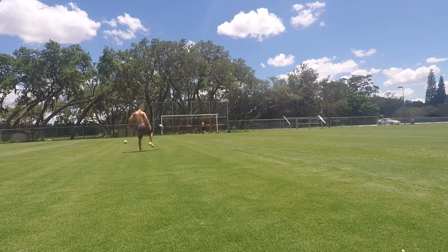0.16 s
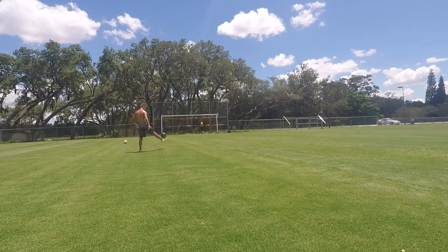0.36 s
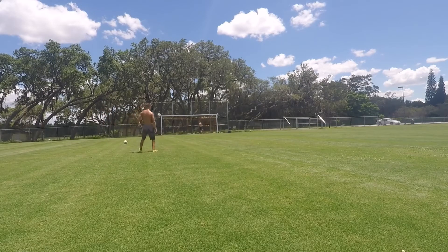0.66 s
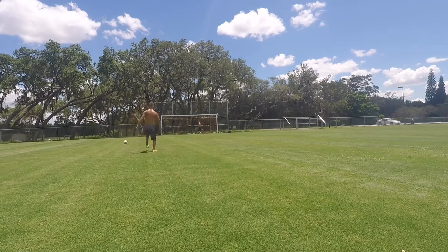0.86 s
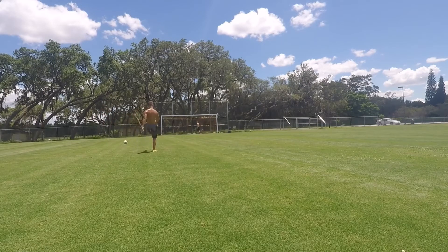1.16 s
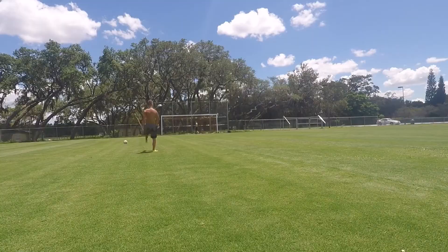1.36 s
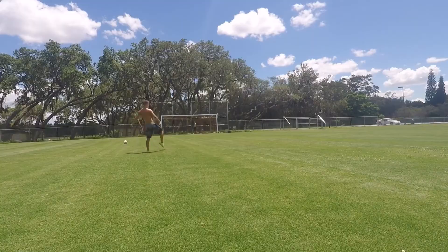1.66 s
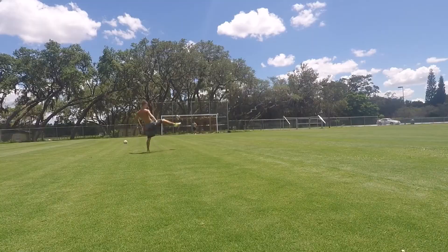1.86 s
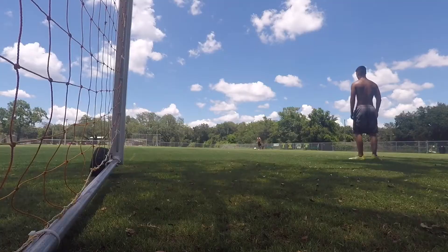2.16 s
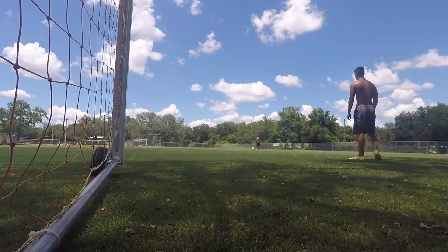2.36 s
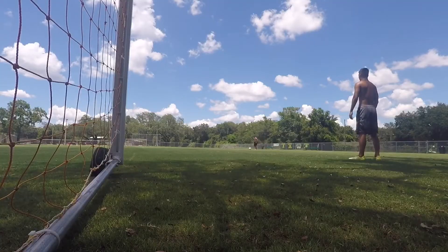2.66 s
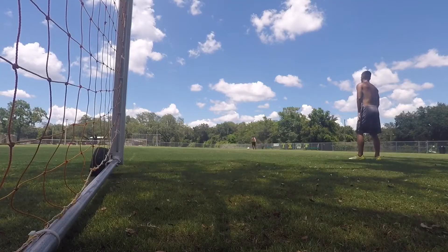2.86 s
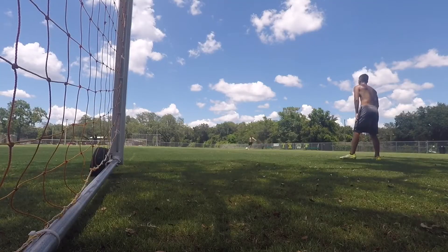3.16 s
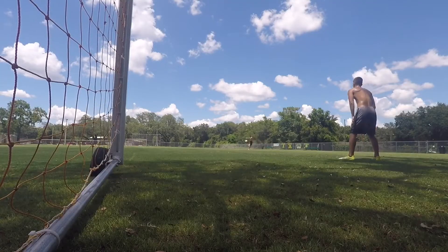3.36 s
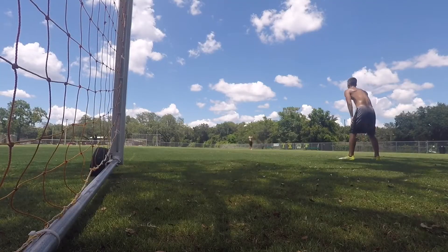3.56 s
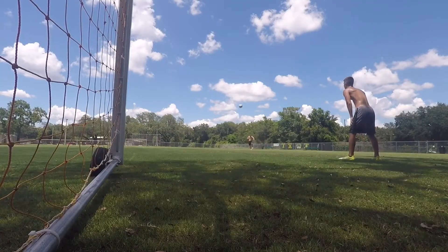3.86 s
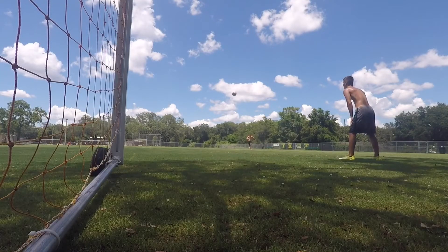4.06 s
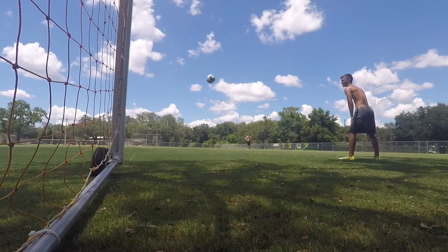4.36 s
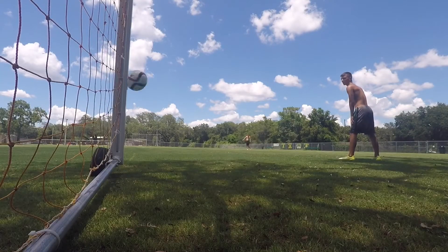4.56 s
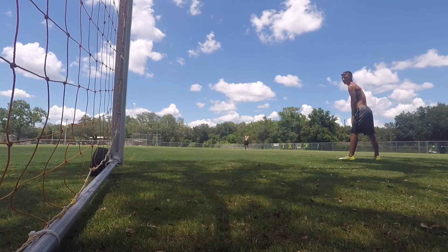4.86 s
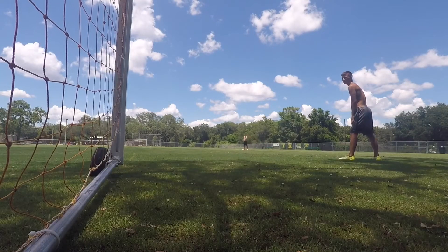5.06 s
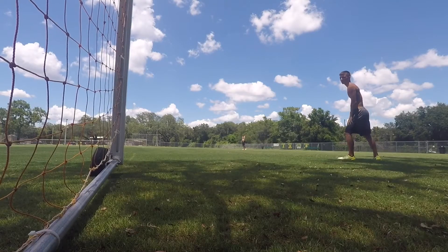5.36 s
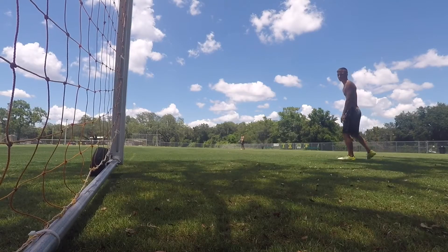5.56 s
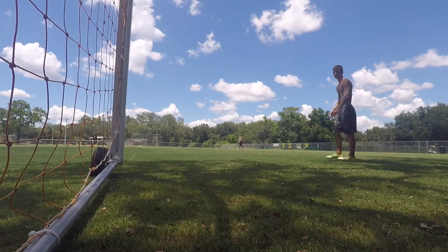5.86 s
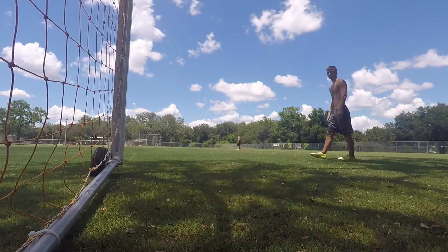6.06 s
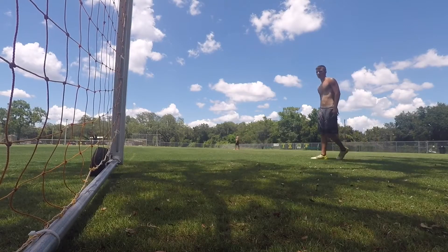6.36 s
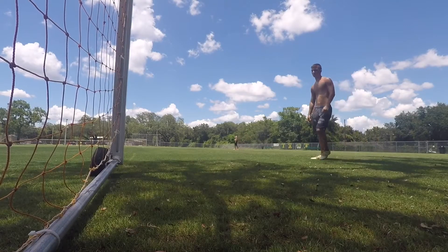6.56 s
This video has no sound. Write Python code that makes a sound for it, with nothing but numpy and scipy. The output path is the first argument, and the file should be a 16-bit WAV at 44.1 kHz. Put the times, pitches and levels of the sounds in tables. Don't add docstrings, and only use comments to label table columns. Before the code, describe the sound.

On an open grass field with light wind buffeting the microphone, a faint cicada and tiny distant birds, a ball is kicked with a slappy thump, touched softly, then kicked again. The background dips and slowly returns beside the goal. A deep far kick thuds, then the ball smashes the hollow metal frame very close and loud, ringing and rattling; it clanks on the ground bar and brushes through the net.

```python
import sys
import numpy as np
from scipy import signal
from scipy.fft import rfft, irfft, next_fast_len
from scipy.io import wavfile
from scipy.ndimage import uniform_filter1d, map_coordinates

SR = 44100
rng = np.random.default_rng(int(sys.argv[2]) if len(sys.argv) > 2 else 0)


def gain_from_db(level_db):
    decades = np.asarray(level_db, float) / 20
    return 10 ** decades


def master_out(mix):
    frames = np.transpose(np.atleast_2d(mix))
    ceiling = np.clip(frames, -1, 1)
    pcm = np.round(ceiling * 32767).astype(np.int16)
    wavfile.write(sys.argv[1], SR, pcm)


N = 295320

# time_s, level_db
WIND_GUSTS = [(0, -43), (.42, -42.5), (.58, -44), (.98, -41.5), (1.5, -43.5), (1.83, -40), (2.2, -41),
              (2.7, -38.5), (3.13, -41), (3.38, -36), (3.66, -41), (4.19, -38), (4.5, -39), (5.3, -38),
              (5.55, -42), (6.29, -40.5), (6.7, -40)]
# freq_hz, level_db (per Hz)
BUFFET_COLOUR = [(8.8, -18.5), (15, -3), (38, 2), (102, 0), (139, -5.5), (168, -8), (210, -16.5),
                 (250, -14), (320, -33.5), (550, -120)]
# freq_hz, level_db (per Hz)
ROAR_COLOUR = [(88, -24.5), (150, 0.5), (262, -6.5), (296, -7), (323, -6.5), (346, -5.5), (1200, -37.5),
               (1560, -72), (2640, -120)]
# freq_hz, level_db (per Hz)
HISS_COLOUR = [(350, -9.5), (600, -12.5), (800, -11), (1120, -13.5), (2500, -15.5), (5300, -18.5),
               (6300, -22), (8000, -24), (11500, -27), (14000, -26.5), (15000, -19), (16000, -20.5)]
# pitch_hz, level_db (rms)
HUM_TONES = [(296, -57.5), (716, -76.5), (1077, -81)]
# pitch_hz, level_db (rms)
WHINE_TONES = [(7337, -85), (7386, -89), (14578, -93), (14626, -87), (14675, -81), (14723, -76),
               (14815, -94), (14863, -92)]
# pitch_hz, width_hz, early_db, late_db
CICADA_BODY = [(4750, 67, 0, -3), (5100, 140, -9, 2), (7660, 82, -2, -1), (8520, 190, -0.5, -3.5),
               (9280, 150, 0, -4), (9860, 140, -7, -3.5)]
# start_s, length_s, first_hz, last_hz, peak_db
BIRD_NOTES = [
    (.672, .105, 3570, 3030, -65),
    (.765, .05, 3050, 2580, -71),
    (5.14, .16, 2820, 2795, -74),
    (.968, .045, 2550, 2310, -74.5),
    (1.0, .06, 2310, 2460, -74),
    (2.545, .055, 5490, 5440, -72),
    (4.49, .055, 6380, 6370, -77),
]
# time_s, level_db, length_s, brightness_db (per octave)
BRUSHES = [(1.54, -47.5, 0.021, 1), (1.98, -58.5, 0.016, 1), (3.343, -51.5, 0.062, 5),
           (4.861, -57, 0.13, 6), (4.921, -52, .012, 5.5), (4.946, -42, 0.041, 1), (4.998, -53.5, 0.065, 3),
           (5.073, -37.5, 0.053, -1), (5.134, -39, 0.029, 0), (5.208, -56.5, .04, 7),
           (5.242, -53, 0.014, -1), (5.259, -49, 0.069, 3), (5.431, -46, 0.013, 2.5),
           (5.481, -45, 0.012, -3)]
# freq_hz, level_db (per Hz)
NET_COLOUR = [(120, -48), (200, -17.5), (352, 1.5), (711, -22.5), (984, -18), (1340, -34), (1510, -26.5),
              (1820, -35), (2280, -30), (12000, -63.5), (15600, -86), (22000, -120)]
# start_s, level_db, pitch_hz, edge_db (sharp edge), t60_s (time to fade by 60 dB)
SLAPS = [
    (0.377, -18.5, 3140, -20, 0.0065),
    (0.3779, -37, 1290, -40, 0.023),
    (1.116, -44.5, 2300, -44, 0.02),
    (1.1165, -44, 1300, -30, 0.02),
    (1.9021, -29, 1285, -12, 0.0063),
    (1.9022, -28, 3160, -5, 0.0087),
    (1.9024, -29, 4650, -6, 0.0069),
    (4.5886, -15, 2020, -16, 0.032),
    (4.7517, -18, 4250, -12, 0.045),
]
# start_s, push_db, end_hz, rise_s, skin_db (ring of the skin)
PUSHES = [
    (0.3779, -20.5, 107, 0.0034, -41.5),
    (1.1197, -19.5, 88, 0.005, -55),
    (1.9026, -20.5, 79, 0.0044, -37),
    (3.3143, -6.5, 91.5, 0.006, -26),
    (3.3258, -25.5, 249, .002, -23),
    (4.5885, -1.5, 88, 0.00065, -12.5),
    (4.7521, -6.5, 200, 0.0017, -38),
]
# pitch_hz, level_db, t60_s
FRAME_MODES = [(187, 2, 0.39), (278.5, -0.5, 0.16), (364, -4, 0.3), (499, -31, 0.35), (600, -27, 0.21),
               (683, -21, .35), (824, -17.5, 0.34), (952, -23, 0.46), (1073, -20, .15), (1055, -22, 0.38),
               (1310, -17, 0.21), (1505, -30, 0.35), (1720, -23, 0.4), (2030, -36, 0.29), (2370, -19, 0.17),
               (3080, -31.5, 0.76), (4300, -21.5, 0.15), (4930, -20, 0.098), (8247, -49, 0.89),
               (11070, -40, 0.22)]
# pitch_hz, level_db, t60_s
UPRIGHT_OVERTONES = [(770, -24, 0.2), (1260, -43, .3), (1407, -38, 0.25), (1640, -17, 0.23),
                     (1880, -33, 0.41), (2720, -31.5, 0.71), (2815, -41, .25), (3500, -38, .2),
                     (4500, -39, .2), (6200, -31, .15), (10080, -42, .17), (4285, -38, .24)]
# pitch_hz, level_db, t60_s
GROUND_BAR_MODES = [(235, 1, 0.11), (291, 3.5, 0.14), (404, 6.5, 0.15), (457, -10, 0.39),
                    (555, -11.5, 0.28), (920, -19, 0.11), (1005, -14, 0.24), (1220, -22, 0.29),
                    (2130, -45, .2), (2880, -41, 0.56), (5100, -36, 0.11), (7900, -26, 0.13)]
# pitch_hz, level_db, t60_s
GOAL_SWAY = (62, -13, 0.5)
# freq_hz, level_db (per Hz)
RATTLE_COLOUR = [(120, -22), (200, -11), (240, -9), (392, -11), (641, -18), (940, -22), (1350, -30),
                 (1780, -29), (4580, -41.5), (5300, -35.5), (5800, -46), (15500, -60)]
# freq_hz, t60_s
RATTLE_FADE = [(200, 0.33), (1000, 0.3), (3000, 0.2), (6000, 0.13), (14000, 0.079)]
# start_s, ring_db, rattle_db, decay_share, lean_s (until the ball chokes the low ring)
BLOWS_ON_METAL = [
    (4.5838, -60, -24, 0.61, 0.014),
    (4.588, -15, -20, 0.94, 0.19),
    (4.751, -18, -26, 0.79, 0.034),
    (4.766, -30, -30.5, 1.13, 0.024),
]

SCENE_CHANGE_S = 2.058
STRIKE_S = BLOWS_ON_METAL[1][0]


def unit(x):
    return x / np.sqrt(np.mean(x ** 2) + 1e-20)


def along(points, hz):
    f, v = np.transpose(points)
    return np.interp(np.log(hz + 1), np.log(f + 1), v)


def wobble(rate):
    knots = rng.standard_normal(int(N * rate / SR) + 4)
    return map_coordinates(knots, [np.arange(N) * rate / SR])


def filtered(x, response):
    m = next_fast_len(len(x) + 8192)
    return irfft(rfft(x, m) * response(np.fft.rfftfreq(m, 1 / SR)), m)[:len(x)]


def peak(f, hz, width):
    return 1j * f * width / (hz * hz - f * f + 1j * f * width)


def noise(colour, count=N, tilt_db=0):
    white = rng.standard_normal(count)
    return unit(filtered(white, lambda f: gain_from_db(along(colour, f) + tilt_db * np.log2(f / 1000 + 0.41))))


def add(track, s, sound):
    part = track[round(s * SR):][:len(sound)]
    part += sound[:len(part)]


def air():
    t = np.arange(N) / SR
    strength_db = np.interp(t, *np.transpose(WIND_GUSTS))
    gust = wobble(7)
    buffet = unit(gain_from_db(1.15 * gust + 1.52 * wobble(18)) * noise(BUFFET_COLOUR))
    roar = unit(gain_from_db(0.9 * gust + 1.5 * wobble(25)) * noise(ROAR_COLOUR))
    wind_roar = gain_from_db(-53 + 0.44 * (strength_db - strength_db.mean()))
    since_strike = t - STRIKE_S
    stir = (since_strike > 0) * gain_from_db(-37.5 - 60 * np.abs(since_strike) / 3.3)
    hiss_db = np.where(t < SCENE_CHANGE_S, -61, -62.5)
    hiss = gain_from_db(hiss_db + 0.26 * wobble(5.09)) * noise(HISS_COLOUR)
    return gain_from_db(strength_db + 3) * buffet + np.hypot(wind_roar, stir) * roar + hiss


def machine_hum():
    t = np.arange(N) / SR
    hum = np.zeros(N)
    for hz, db in HUM_TONES:
        level = gain_from_db(db + 2.5 + 0.97 * wobble(11))
        hum += level * np.sin(2 * np.pi * hz * t + 0.4 * wobble(6.2))
    return hum


def camera_whine():
    t = np.arange(N) / SR
    return sum(np.sqrt(2) * gain_from_db(db) * np.sin(2 * np.pi * (hz * t + rng.random())) for hz, db in WHINE_TONES)


def cicada():
    t = np.arange(N) / SR
    click_turn = 2 * np.pi * 94 * t + 0.5 * wobble(3)
    clicks = rng.standard_normal(N) * np.exp(1.3 * np.cos(click_turn))

    def body(f, column):
        return sum((-1) ** k * gain_from_db(row[column]) * peak(f, row[0], row[1]) for k, row in enumerate(CICADA_BODY))

    early = filtered(clicks, lambda f: body(f, 2))
    late = filtered(clicks, lambda f: body(f, 3))
    share = np.clip((t - 0.5) / 0.9, 0, 1)
    song = unit((1 - share) * early + share * late)
    swell_db = np.minimum(t / SCENE_CHANGE_S, 1) ** 3
    return (t < SCENE_CHANGE_S) * gain_from_db(-72 + swell_db) * song


def fade():
    fade_out_s, fade_in_s, floor = 0.081, 1, 0.027
    t = np.arange(N) / SR - SCENE_CHANGE_S
    out = 1 - np.clip(1 + t / fade_out_s, 0, 1) ** 2
    return np.clip(np.where(t < 0, out, t / fade_in_s) + floor, 0, 1)


def birds():
    rise_share, edge_db = 0.42, 9
    out, t = np.zeros(N), np.arange(N) / SR
    for s, length, first_hz, last_hz, peak_db in BIRD_NOTES:
        u = np.clip((t - s) / length, 0, 1)
        hz = first_hz + (last_hz - first_hz) * u
        from_peak = np.maximum(1 - u / rise_share, (u - rise_share) / (1 - rise_share))
        db = peak_db - edge_db * from_peak ** 2
        level = (u > 0) * (u < 1) * gain_from_db(db + 4 + 1.8 * wobble(60))
        out += level * np.sin(2 * np.pi * np.cumsum(hz + 25 * wobble(150)) / SR)
    return out


def brushing():
    rise_share = 0.59
    out = np.zeros(N)
    t = np.linspace(-2, 2, 9000) * 4500 / SR / 2
    for s, db, length, tilt_db in BRUSHES:
        lumps = uniform_filter1d(rng.standard_normal(len(t)), size=70)
        grain = gain_from_db(3.4 * unit(uniform_filter1d(lumps, size=40)))
        side = length * np.where(t < 0, rise_share, 1)
        swell = np.exp(-(1.39 * t / side) ** 2)
        add(out, s + t[0], gain_from_db(db) * swell * unit(grain * noise(NET_COLOUR, len(t), tilt_db)))
    return out


def rattle_noise(share, tilt_db):
    hz, t, z = signal.stft(noise(RATTLE_COLOUR, SR // 2, tilt_db), SR, nperseg=256)
    fall_db = -60 * t / (share * along(RATTLE_FADE, hz)[:, None])
    lingering = gain_from_db(-17 + fall_db / 4.4)
    return signal.istft(z * (gain_from_db(fall_db) + lingering), SR, nperseg=256)[1]


def goal():
    out, t = np.zeros(N), np.arange(SR // 2) / SR
    tubes = (FRAME_MODES, FRAME_MODES + UPRIGHT_OVERTONES, GROUND_BAR_MODES, GROUND_BAR_MODES)
    for (s, ring_db, rattle_db, share, lean), modes in zip(BLOWS_ON_METAL, tubes):
        hz, db, t60 = np.transpose(modes)[..., None]
        steps = rng.standard_normal((len(modes), len(t)))
        drift = np.cumsum(steps, axis=1) * np.minimum(hz, 3500) * np.sqrt(0.6e-5 / SR)
        choke_db = 12 * np.clip((t - lean) / 0.008, 0, 1)
        level = gain_from_db(db - 60 * t / t60 - choke_db * (hz < 1400))
        ring = level * np.sin(2 * np.pi * (hz * t + rng.random(hz.shape)) + drift)
        add(out, s, gain_from_db(ring_db) * ring.sum(axis=0) * (1 - np.exp(-t / 0.0017)))
        rattle = rattle_noise(share, 2.5 / share)[:len(t)] * gain_from_db(-0.4 * choke_db)
        add(out, s, gain_from_db(rattle_db) * rattle * (1 - np.exp(-t / 0.00037)))
    hz, db, t60 = GOAL_SWAY
    sway = gain_from_db(db - 60 * t / t60) * np.sin(2 * np.pi * hz * t)
    add(out, STRIKE_S + 0.0095, sway * (1 - np.exp(-t / 0.012)))
    return out


def ball_push():
    out, t = np.zeros(N), np.arange(SR // 8) / SR
    for s, push_db, end_hz, rise, skin_db in PUSHES:
        turns = end_hz * t + 0.674 * (1 - np.exp(-t / 0.0013))
        attack = 1 - np.exp(-(t / rise) ** 1.04)
        release = np.exp(-(t * end_hz / 1.36) ** 3) + 0.13 * gain_from_db(-60 * t / 0.2)
        add(out, s, gain_from_db(push_db) * attack * release * np.sin(2 * np.pi * turns))
        skin = np.sin(2 * np.pi * 405 * t) + 0.24 * np.sin(2 * np.pi * 490 * t)
        add(out, s, gain_from_db(skin_db - 60 * t / 0.071) * skin * (1 - np.exp(-t / 0.0051)))
    return out


def ball_slap():
    out, t = np.zeros(N), np.arange(SR // 8) / SR
    for s, db, hz, edge_db, t60 in SLAPS:
        burst = rng.standard_normal(len(t)) * (gain_from_db(-60 * t / t60) + 0.11 * gain_from_db(-60 * t / 0.067))
        burst[0] = -13
        ringing = filtered(burst, lambda f: peak(f, hz, 0.85 * hz) ** 2)
        soft = signal.butter(8, 1.5 * hz, fs=SR, output="sos")
        sound = signal.sosfilt(soft, ringing)
        sound = sound / np.abs(sound).max()
        sound[:2] += gain_from_db(edge_db) * np.array([-1, 1])
        add(out, s, gain_from_db(db) * sound)
        add(out, s + 0.00055, 0.17 * gain_from_db(db) * sound)
    return out


def scene():
    steady = fade() * (air() + machine_hum() + camera_whine() + cicada())
    ball = ball_push() + ball_slap()
    return (steady + birds() + brushing() + goal() + ball)[None]


def low_pass(x):
    return signal.sosfilt(signal.butter(12, 15250, fs=SR, output="sos"), x)


def record(dry):
    top_hz, ceiling = 15350, 0.93
    flattened = dry[0] / (1 + np.abs(dry[0] / ceiling) ** 8) ** (1 / 8)
    limited = filtered(flattened, lambda f: 1 / (1 + (f / top_hz) ** 60))
    return low_pass(limited[None])


dry = scene()
out = record(dry)
master_out(out)
```